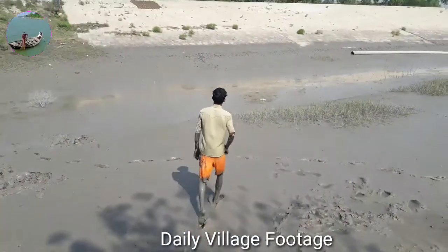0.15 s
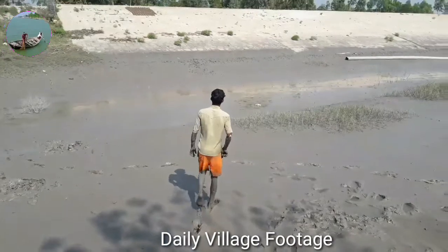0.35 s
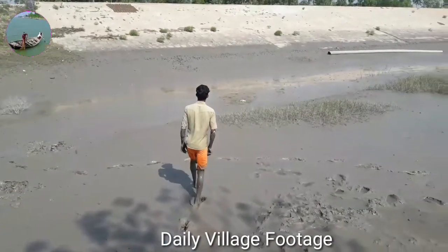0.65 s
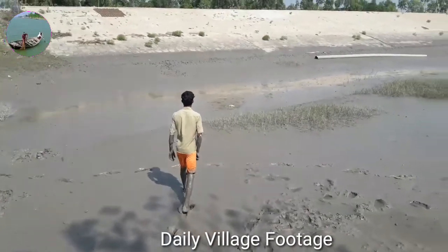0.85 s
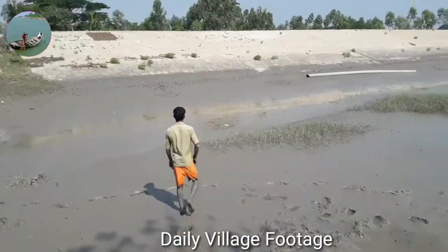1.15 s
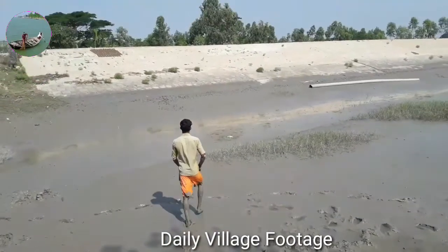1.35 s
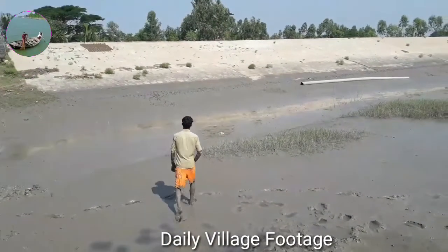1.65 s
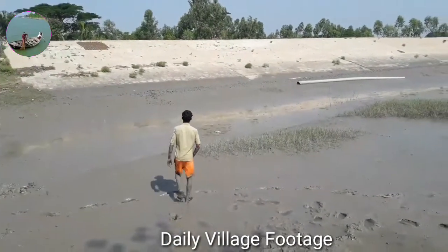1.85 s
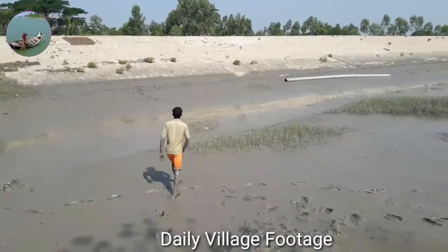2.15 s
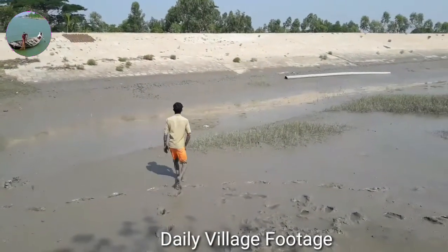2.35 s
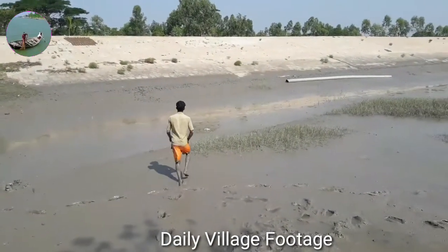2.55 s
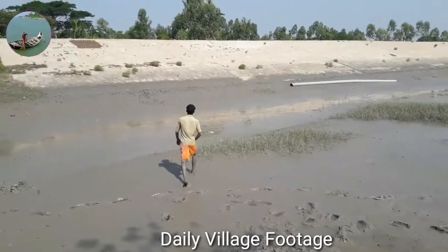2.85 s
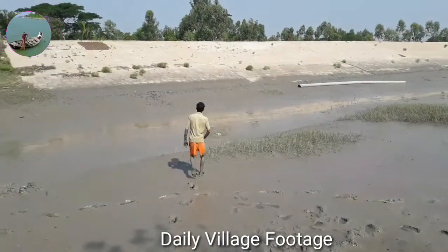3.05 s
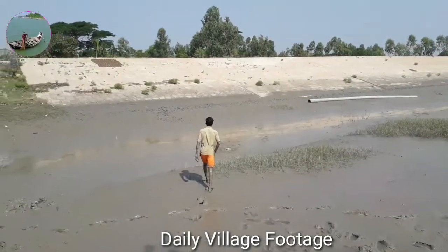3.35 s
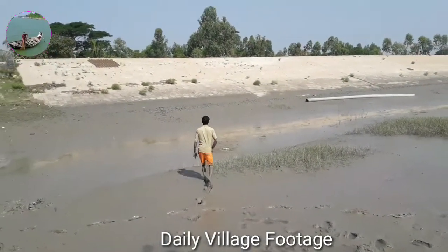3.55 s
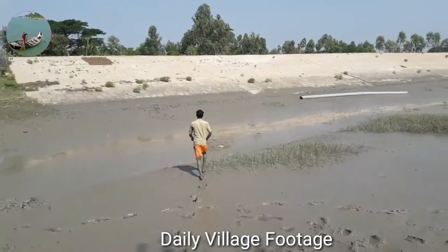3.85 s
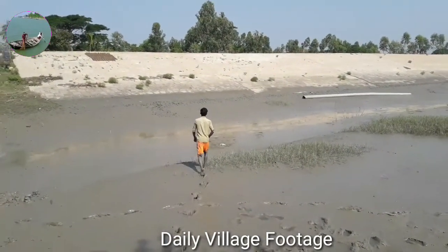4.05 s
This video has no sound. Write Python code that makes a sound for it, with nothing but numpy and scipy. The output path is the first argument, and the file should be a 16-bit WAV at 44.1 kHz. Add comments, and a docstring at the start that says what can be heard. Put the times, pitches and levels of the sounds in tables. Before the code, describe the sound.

Bare feet squelch slowly through wet mud with sharp smacks, sucks and bubble pops, while a nearby bird repeats a short falling call outdoors.

```python
"""A man wades barefoot through the wet mud of a drained riverbed, over a lasting wet hiss and rumbling wind.
From the first step, soles smack and squish (ruptures ringing mud resonances) and air pockets pop (short sines).
A near bird soon starts a phrase of short falling notes, repeated to the end; far birds glide, blurred.
At 1.73 s a cluster of pops overloads the microphone; bubble spurts and steps go on. Nearly mono."""
import sys
import numpy as np
from scipy import signal
from scipy.fft import rfft, irfft, next_fast_len
from scipy.io import wavfile
from scipy.ndimage import uniform_filter1d, map_coordinates

SR = 44100
rng = np.random.default_rng(int(sys.argv[2]) if len(sys.argv) > 2 else 0)


def unload_audio(sound):
    """Save the sound as a 16-bit wav file, at the path given as the first command line argument."""
    columns = np.transpose(np.atleast_2d(sound))
    # keep every value between -1 and 1, then stretch to whole-number steps
    steps = np.round(np.clip(columns, -1, 1) * 32767)
    wavfile.write(sys.argv[1], SR, steps.astype(np.int16))


N = 184867
TIME = np.arange(N) / SR
TOP_HZ = 15600  # band limit

# resonances of wet mud: slab, air pocket, slit under the sole, spray, fine mist: low_hz, high_hz
MUD_BANDS = [(130, 413), (540, 1650), (2100, 4000), (4700, 6720), (7500, 25700)]


def amp(db):
    """Decibels to gain."""
    return 10 ** (np.asarray(db) / 20)


def unit(x):
    """Scale to rms 1."""
    return x / np.sqrt(np.mean(x ** 2) + 1e-20)


def along(points, hz):
    """(Hz, value) points read on a log frequency axis."""
    f, v = np.transpose(points)
    return np.interp(np.log(hz + 1), np.log(f), v)


def curves(rows):
    """One value per sample for each column after the time."""
    s, *cols = np.transpose(rows)
    return [np.interp(TIME, s, c) for c in cols]


def wobble(rate_hz):
    """Smooth random curve, rate_hz knots a second."""
    knots = rng.standard_normal(int(N * rate_hz / SR) + 4)
    return map_coordinates(knots, [TIME * rate_hz])


def filtered(x, response):
    """x times a response of frequency."""
    m = next_fast_len(N + SR // 2)
    return irfft(rfft(x, m) * response(np.fft.rfftfreq(m, 1 / SR)), m)[..., :N]


def coloured(x, spectrum):
    """x with a (Hz, dB) colour, at rms 1."""
    return unit(filtered(x, lambda hz: amp(along(spectrum, hz))))


def patchy(x, depth_db):
    """Fleeting brighter and duller patches drift through the colour of x."""
    z = signal.stft(x, nperseg=256)[2]
    field = uniform_filter1d(rng.standard_normal(z.shape), size=4, axis=0)
    field = uniform_filter1d(field, size=9, axis=1)
    return signal.istft(z * amp(depth_db * unit(field)), nperseg=256)[1][:N]


def add(track, s, sound):
    """Mix a sound into the track at time s."""
    part = track[max(round(s * SR), 0):][:len(sound)]
    part += sound[:len(part)]


def ruptures(size, spread_db):
    """Countless tiny films snapping: mostly weak impulses, a few strong."""
    strength_db = spread_db * np.clip(rng.standard_normal(size), -3, 2.6)
    return rng.standard_normal(size) * amp(strength_db)


def clumps(size, depth_db):
    """Gain of mud letting go in fits, a couple of milliseconds each."""
    fits = unit(uniform_filter1d(rng.standard_normal(size), size=80))
    return amp(depth_db * np.clip(fits, -2, 2))


def mud_levels(db, hz, falloff_db):
    """Level of each resonance, falling away by octaves from the strongest frequency."""
    # how readily each mud resonance speaks: trim_db
    trim_db = [-0.5, -1, -1, 1, -3]
    centre_hz = np.sqrt(np.prod(np.minimum(MUD_BANDS, TOP_HZ), axis=1))
    return db + np.array(trim_db) - falloff_db * np.abs(np.log2(centre_hz / hz))


def through_mud(drive, levels_db, seconds, ripple_db=3, order=3):
    """The drive (one row per resonance) rings the mud, to each rms level over the given time."""
    out = np.zeros(drive.shape[1])
    gap = np.zeros(rng.integers(SR // 2500, SR // 900))  # the gap under the foot has a new size each time
    gap[0], gap[-1] = 1, -np.tanh(ripple_db * np.log(10) / 20)
    for (low_hz, high_hz), db, row in zip(MUD_BANDS, levels_db, drive):
        edges_hz = [low_hz, min(high_hz, SR / 2 - 500)]
        band = signal.butter(order, edges_hz, "band", fs=SR, output="sos")
        ring = signal.sosfilt(band, signal.lfilter(gap, 1, row))
        out += amp(db) * ring * np.sqrt(seconds * SR / (np.sum(ring ** 2) + 1e-20))
    return out


def smacks():
    """The sole parts from the mud: a crack, then a thinning, fitful burst of ruptures whose treble dies first."""
    # wet films tearing: start_s, t60_s (at 4 kHz), level_db (over 10 ms, before band trims),
    # strongest_hz, falloff_db_per_octave (to both sides)
    tears = [(0.0183, 0.0074, -36, 4500, 6.5), (0.0518, 0.058, -19, 4620, 16.5),
             (0.0767, 0.002, -25, 1060, 2), (.214, 0.034, -10, 2570, 7), (0.2316, 0.045, -23, 2800, 3),
             (.749, 0.0034, -24, 4200, 15.5), (0.9879, 0.011, -24, 4370, 5), (1.023, 0.052, -19.5, 615, 12),
             (1.032, 0.093, -30, 2000, 2.5), (1.0565, 0.053, -34.5, 7000, 3), (1.1822, 0.025, -26, 2970, 8),
             (1.276, .082, -24.5, 3070, 21), (1.589, 0.1, -18.5, 7850, 15.5),
             (1.664, 0.061, -38.5, 2800, 9), (1.707, 0.15, -19.5, 1760, 4), (1.725, 0.028, -9, 1230, 10),
             (1.738, 0.25, -27, 890, 22), (1.913, 0.17, -34, 6500, 8.5), (2.188, 0.062, -31, 3710, 9.5),
             (2.214, 0.049, -27.5, 4000, 24), (2.246, 0.079, -32.5, 2600, 14),
             (2.3009, 0.075, -13.5, 4200, 23), (2.3337, 0.084, -25.5, 3190, 4.5),
             (2.346, 0.3, -33.5, 1900, 9), (2.758, 0.045, -39, 6000, 10), (2.874, 0.061, -27.5, 2950, 30),
             (2.95, .04, -40, 1500, 3), (2.968, 0.054, -25.5, 830, 2.5), (2.982, 0.028, -21, 2800, 31),
             (3.1255, 0.053, -20, 4400, 10), (3.234, 0.035, -35.5, 10840, 14),
             (3.365, 0.015, -29.5, 10190, 9.5), (3.5604, .035, -17, 4200, 15),
             (3.572, 0.13, -26.5, 1790, 10), (3.764, 0.15, -36.5, 6500, 6.5), (3.801, 0.19, -48, 3100, 11),
             (4.127, 0.092, -28.5, 9770, 10), (4.13, 0.077, -39, 1000, 9), (4.161, .023, -25, 8300, 20)]
    out, t = np.zeros(N), TIME[:SR // 5]
    life = (np.mean(MUD_BANDS, axis=1, keepdims=True) / 4000) ** -.15
    for s, t60_s, db, hz, falloff_db in tears:
        tearing = ruptures(len(t), spread_db=2.5) * clumps(len(t), depth_db=-0.46)
        onset = 1 - np.exp(-t / (0.0096 * t60_s))
        drive = tearing * amp(-60 * t / (t60_s * life)) * onset
        drive[:, SR // 2000] += 3.5  # crack
        add(out, s, through_mud(drive, mud_levels(db, hz, falloff_db), seconds=1 / 100))
    return out


def squishes():
    """The foot sinks in: water and air fizz out in a swell of ruptures."""
    # mud squeezed out under a foot: start_s, end_s, level_db (before band trims and the overall trim),
    # strongest_hz, falloff_db_per_octave
    squeezes = [(0.082, 0.123, -32, 805, 4), (0.116, 0.199, -20.5, 1110, 8.5), (0.168, 0.22, -28, 1440, 4),
                (0.374, 0.444, -36.5, 11000, 13), (0.871, 0.942, -25, 10100, 8.5),
                (0.92, 1.003, -33, 11000, 16), (0.887, 0.967, -39, 300, 3),
                (1.036, 1.21, -33.5, 9300, 19.5), (1.177, 1.305, -34.5, 10270, 3.5),
                (1.265, 1.325, -24, 3460, 12), (1.287, 1.37, -26.5, 3110, 11.5),
                (3.082, 3.142, -26, 9200, 12), (3.117, 3.156, -20, 8000, 2.5),
                (3.295, 3.42, -28, 9200, 14.5), (3.581, 3.76, -39, 6740, 8.5)]
    trim_db = -4
    out, t = np.zeros(N), TIME[:SR // 4]
    for start_s, end_s, db, hz, falloff_db in squeezes:
        length_s = max(end_s - start_s, .01)
        swell = np.abs(np.sin(np.pi * np.clip(t / length_s, 0, 1))) ** 0.9
        grains = ruptures((len(MUD_BANDS), len(t)), spread_db=2.5)
        drive = grains * clumps(len(t), depth_db=2.2) * swell
        levels_db = mud_levels(db, hz, falloff_db)
        # pressed mud rings more broadly
        add(out, start_s, through_mud(drive, levels_db, length_s, ripple_db=-1.5, order=2))
    return patchy(out, depth_db=-0.8) * amp(trim_db)


def pops():
    """An opened air pocket rings briefly, its pitch creeping up as it closes."""
    # bursting cavities: start_s, peak_db (before onset and decay), pitch_hz (initial), t60_s
    cavities = [(0.0774, -14.5, 260, 0.0079), (.168, -16.5, 560, 0.026), (0.189, -31, 160, 0.045),
                (0.2163, -7.5, 2690, 0.017), (.216, -12.5, 1914, 0.05), (.232, -16, 638, 0.048),
                (0.236, -17, 1706, 0.05), (0.9891, -20, 106, 0.059), (1.031, -18, 5930, 0.049),
                (1.589, -30, 2520, 0.066), (1.7079, -10.5, 1050, 0.027), (1.7259, 3, 641, 0.027),
                (1.7263, 0, 860, 0.042), (1.7307, -1.5, 1060, 0.031), (1.741, -11, 1140, 0.034),
                (1.912, -32, 2467, 0.022), (2.188, -23, 2690, 0.023), (2.217, -27.5, 4270, 0.062),
                (2.3035, -10.5, 3050, 0.023), (2.302, -12.5, 5650, 0.028), (2.341, -20.5, 2105, 0.034),
                (2.346, -35, 2360, 0.18), (2.511, -41, 1780, 0.12), (2.642, -20, 5960, 0.017),
                (2.819, -32.5, 635, 0.05), (2.823, -38.5, 833, 0.12), (2.95, -21.5, 2980, 0.049),
                (2.971, -13.5, 2467, 0.05), (2.976, -13.5, 4080, 0.022), (2.986, -19, 633, 0.036),
                (3.233, -21.5, 5800, 0.0095), (3.535, -31.5, 590, 0.034), (3.562, -12, 2840, 0.028),
                (3.5615, -17, 630, 0.021), (3.562, -22, 223, 0.022)]
    out, t = np.zeros(N), TIME[:SR // 6]
    for s, db, hz, t60_s in cavities:
        pitch_hz = hz * (1 + 0.01 * np.minimum(t / t60_s, 1))
        envelope = amp(db - 60 * t / t60_s) * (1 - np.exp(-t / 0.000086))
        flow = envelope * np.sin(2 * np.pi * np.cumsum(pitch_hz) / SR)
        # a small mouth radiates the change of its flow
        add(out, s, np.gradient(flow) / np.sin(2 * np.pi * hz / SR))
    return out


def bubble(db, hz, size):
    """A tiny bubble ticks as a decaying sine with a soft start; larger ones sound lower."""
    t60_s, rise_s, pitch_spread = 0.0086, 0.0009, 0.11
    t = TIME[:SR // 30]
    ring = amp(db - 60 * t / t60_s) * (1 - np.exp(-t / rise_s))
    pitch_hz = hz * np.exp(-pitch_spread * np.clip(size, -2, 2))
    return ring * np.sin(2 * np.pi * pitch_hz * t)


def spurts(count=10):
    """A footprint lets out a quick, slowing string of bubbles."""
    # bubble strings: start_s, peak_db (each bubble, before onset and decay), pitch_hz (middle size)
    strings = [(.433, -38.5, 3230), (.695, -29.5, 6160), (1.459, -30, 5900), (1.884, -31, 6830),
               (2.032, -27, 5250), (2.114, -27, 5600), (2.475, -35, 6450), (2.488, -33, 3350),
               (2.53, -29, 6260), (2.643, -23, 5900), (2.664, -30, 5400), (2.702, -31.5, 5450),
               (2.854, -27.5, 5800), (3.766, -36, 2980), (3.802, -30, 3530), (3.879, -44, 4800),
               (3.905, -34.5, 4900), (4.066, -26.5, 5600)]
    spurt_s = 0.011
    out = np.zeros(N)
    for s, db, hz in strings:
        delays_s = spurt_s * ((np.arange(count) + rng.random(count)) / count) ** 1.3
        for delay_s, size in zip(delays_s, rng.standard_normal(count)):
            add(out, s + delay_s, bubble(db, hz, size))
    return out


def near_bird():
    """One phrase, over and over: short, slightly hoarse notes, each sliding down, with a weak octave."""
    # notes of the phrase: before_last_s, level_db (relative to the call), pitch_hz (mid-note), length_s
    phrase = [(.152, -7, 1305, 0.023), (.139, -8, 1040, 0.014), (.081, -5, 1020, 0.022),
              (.015, -13, 1200, 0.017), (0.0016, 0.5, 1042, .027)]
    # calls: last_note_s, level_db
    calls = [(0.279, -27.5), (0.972, -28), (1.673, -27.5), (2.36, -27.5), (3.056, -26), (3.745, -27)]
    out, t = np.zeros(N), np.arange(-SR // 20, SR // 20) / SR
    notes = [(call_s - before_s, call_db + note_db, hz, length_s)
             for call_s, call_db in calls
             for before_s, note_db, hz, length_s in phrase]
    wavers = wobble(400)[:len(notes) * len(t)].reshape(len(notes), -1)
    for (s, db, hz, length_s), waver in zip(notes, wavers):
        pitch_hz = hz * (1 - .085 * np.tanh(1.2 * t / length_s) + .032 * waver)
        phase = 2 * np.pi * np.cumsum(pitch_hz) / SR
        tone = np.sin(phase) + amp(-45) * np.sin(2 * phase)
        add(out, s + t[0], amp(db) * np.exp(-(2 * t / length_s) ** 2) * tone)
    return out * amp(wobble(210))


def far_birds():
    """Long gliding whistles and hoots, blurred and broken up by scattering on their way."""
    # calls: start_s, end_s, level_db (rms before the swell), first_hz, last_hz, scattered_share (clipped to 0-1)
    whistles = [(0.211, 0.657, -48, 725, 706, 0.3), (0.656, .92, -47.5, 1336, 1616, 0.9),
                (1.544, 1.624, -46, 2300, 2450, 0.6), (2.006, 2.155, -49.5, 3040, 2555, 0.73),
                (3.884, 4.02, -51.5, 3175, 2450, 1.1), (3.958, 4.219, -54.5, 1195, 1130, 0.9),
                (4.04, 4.198, -52, 2466, 2280, 0.56)]
    blur = .17  # haze knot rate as a share of first_hz
    out = np.zeros(N)
    for start_s, end_s, db, first_hz, last_hz, scattered in whistles:
        u = np.clip((TIME - start_s) / (end_s - start_s), 0, 1)
        share = np.clip(scattered, 0, 1)
        phase = 2 * np.pi * np.cumsum(first_hz + (last_hz - first_hz) * u) / SR
        haze = wobble(blur * first_hz) * np.sin(phase) + wobble(blur * first_hz) * np.cos(phase)
        tone = np.sqrt(2 * (1 - share)) * np.sin(phase) + np.sqrt(share) * haze
        out += amp(db) * (4 * u * (1 - u)) ** 0.7 * tone
    return out


def seep(count=90):
    """Tiny bubbles tick in the footprints at random."""
    out = np.zeros(N)
    times_s = rng.uniform(0, N / SR, count)
    for s, (strength, size) in zip(times_s, rng.standard_normal((count, 2))):
        add(out, s, bubble(-44.5 + 4.5 * min(strength, 1.5), 6100, size))
    return out


def bed():
    """The wet flat murmurs, hisses and fizzes in fine grains; water wells up around each footfall."""
    # swells of welling water: peak_s, murmur_db, hiss_db
    footfalls = [(.19, -37.5, -33.5), (1.0, -37, -36), (1.702, -49, -41.5), (2.259, -58.5, -45),
                 (2.98, -47, -45), (3.582, -47.5, -34), (4.19, -52, -39.5)]
    # low murmur between the swells, fading after the first second: time_s, level_db
    murmur_floor = [(0, -50), (.8, -51), (1.3, -59), (4.19, -58)]
    # colours of the three layers: freq_hz, level_db (relative)
    murmur_colour = [(150, 3.5), (300, 8), (700, 8.5), (1400, 5), (2200, 5), (4000, -10)]
    hiss_colour = [(900, -38.5), (1700, -35.5), (2600, 6), (4000, 8), (5200, 10.5), (6300, 14),
                   (7300, 12.5), (8200, -3.5), (11000, -54.5)]
    fizz_colour = [(6000, -14), (8000, -8.5), (10500, 4), (13000, 4), (15200, 9.5), (16000, 7.5)]
    well_s, drain_s = 0.14, 0.075  # time constants of rise and fall
    hiss_floor_db, fizz_floor_db = -50.5, -51.5
    fizz_re_hiss_db = -4  # in the swells

    murmur_swell, hiss_swell = np.zeros(N), np.zeros(N)
    for s, murmur_db, hiss_db in footfalls:
        swell = np.exp(-np.maximum((s - TIME) / well_s, (TIME - s) / drain_s))
        murmur_swell += amp(murmur_db) * swell
        hiss_swell += amp(hiss_db) * swell
    murmur = np.hypot(amp(curves(murmur_floor)[0]), murmur_swell) * amp(wobble(23))
    hiss = np.hypot(amp(hiss_floor_db), hiss_swell) * amp(0.987 * wobble(41))
    fizz = np.hypot(amp(fizz_floor_db), amp(fizz_re_hiss_db) * hiss_swell) * amp(wobble(68))
    return (murmur * coloured(ruptures(N, spread_db=1.5), murmur_colour)
            + hiss * coloured(patchy(ruptures(N, spread_db=6.5), depth_db=3.5), hiss_colour)
            + fizz * coloured(ruptures(N, spread_db=2.5), fizz_colour))


def wind():
    """Wind nudges the microphone: lumpy low-frequency noise with a few single buffets."""
    # rumble: time_s, level_db (before trim_db and the wobble)
    gusts = [(0, -38), (.2, -42), (.6, -49.5), (.85, -47), (.99, -35.5), (1.12, -45.5), (1.35, -42.5),
             (1.9, -47.5), (2.7, -40.5), (2.87, -52), (3.01, -25.5), (3.1, -38), (3.3, -25.5),
             (3.45, -35.5), (3.8, -36.5), (4.19, -44.5)]
    # rumble colour: freq_hz, level_db (relative)
    rumble_colour = [(15, -34), (30, -15.5), (45, -4), (65, 3), (110, -1.5), (160, -9.5), (250, -17.5),
                     (500, -32), (1200, -65)]
    # single buffets: centre_s, peak_db, freq_hz
    buffets = [(.085, -28.5, 94), (3.025, -23.5, 111), (3.235, -23, 137), (3.351, -29, 140),
               (3.383, -22, 120), (3.497, -26, 89), (3.621, -24, 92), (3.694, -20.5, 80.6)]
    trim_db, buffet_cycles = -4.5, 1.5
    level_db = curves(gusts)[0] + trim_db + 3.4 * wobble(48)
    out = amp(level_db) * coloured(rng.standard_normal(N), rumble_colour)
    for s, db, hz in buffets:
        cycles = (TIME - s) * hz
        out -= amp(db) * np.exp(-(2 * cycles / buffet_cycles) ** 2) * np.cos(2 * np.pi * cycles)
    return out


def side_noise():
    """Faint steady recording noise, different in each channel; coloured Gaussian noise at rms 1."""
    # noise colour: freq_hz, level_db (relative)
    noise_colour = [(25, -6.5), (60, -9), (130, 0.5), (300, -6), (800, -4.5), (1500, -11), (3000, -8.5),
                    (6000, -11.5), (9000, -18), (15000, -4)]
    return coloured(rng.standard_normal(N), noise_colour)


def bank(x):
    """Thin echo of the embankment: decaying noise after 10 ms, uneven in decay over frequency."""
    # decay of the echo: freq_hz, t60_s
    decay = [(200, 0.083), (1000, 0.23), (3000, 0.22), (8000, 0.11), (16000, 0.9)]
    hz, t, z = signal.stft(rng.standard_normal(SR // 2), SR, nperseg=256)
    fade = amp(-60 * t / along(decay, hz)[:, None])
    tail = signal.istft(z * fade, SR, nperseg=256)[1]
    return signal.fftconvolve(x, np.pad(tail, (SR // 100, 0)) / np.linalg.norm(tail))[:N]


def scene():
    steps = smacks() + squishes() + pops()
    birds = near_bird() + far_birds()
    to_bank = amp(-14.5) * steps + amp(-7.5) * birds
    mid = steps + birds + bank(to_bank) + seep() + spurts() + bed() + wind()
    side = amp(-55.5) * side_noise() + amp(-29) * bank(to_bank)
    return np.array([mid + side, mid - side])


def record(dry):
    """Clip the loudest pops at full scale, then low-pass steeply at the band limit."""
    return filtered(np.clip(dry, -1, 1), lambda hz: 1 / np.sqrt(1 + (hz / TOP_HZ) ** 200))


dry = scene()
out = record(dry)
unload_audio(out)
```